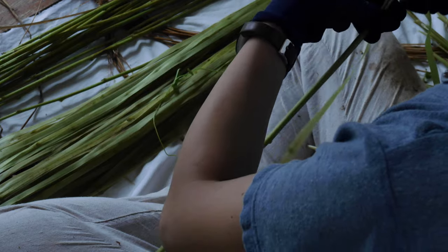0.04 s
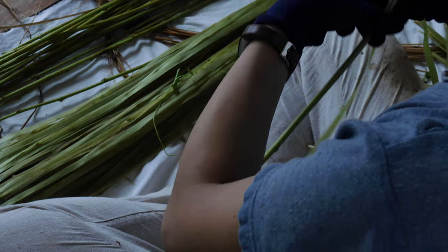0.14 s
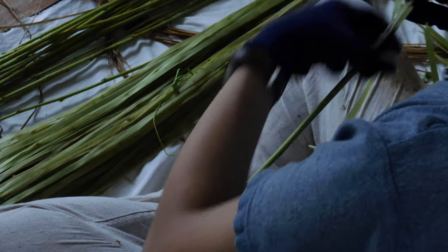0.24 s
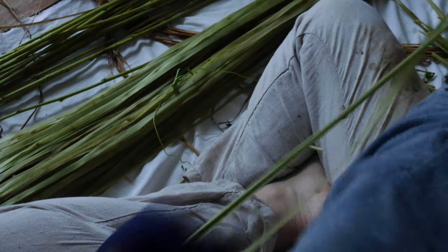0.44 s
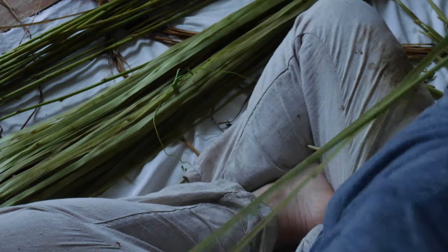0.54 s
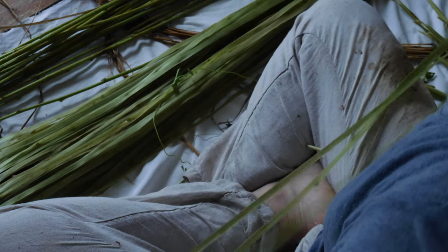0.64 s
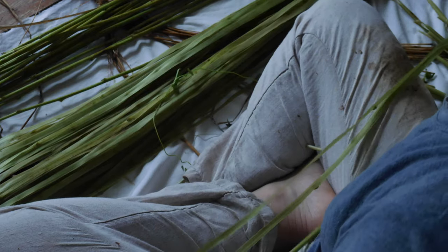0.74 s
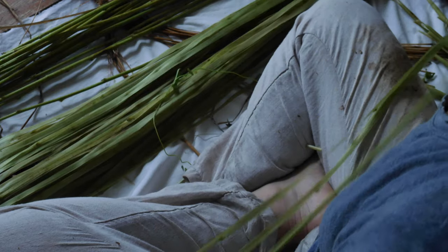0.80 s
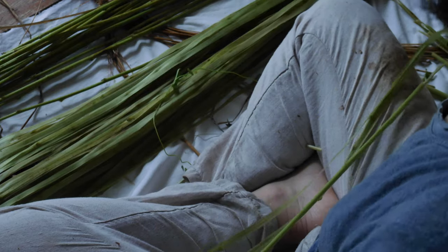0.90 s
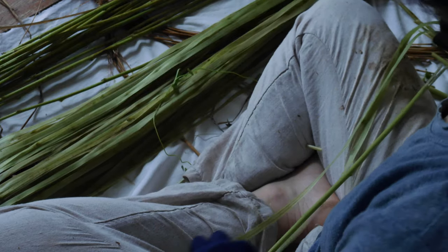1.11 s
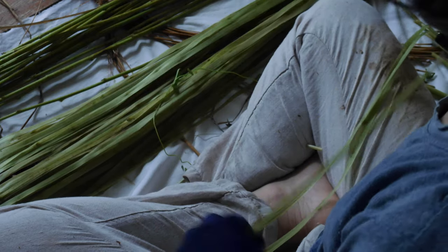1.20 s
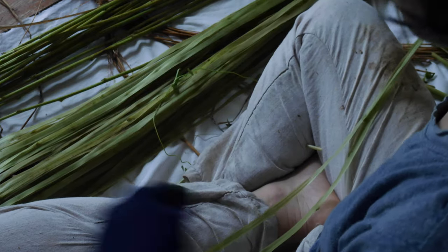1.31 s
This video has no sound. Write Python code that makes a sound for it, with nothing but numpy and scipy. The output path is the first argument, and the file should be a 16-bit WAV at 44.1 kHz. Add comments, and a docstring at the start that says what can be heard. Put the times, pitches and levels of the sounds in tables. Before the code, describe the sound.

A plant stem tears in one crackling pull, with dull knocks over faint outdoor hiss.

```python
"""Over a faint steady hiss, gloved hands knock and crack a green plant stem.
A strip of fibre is then ripped off in one long pull: thousands of tiny fibres snap,
its edge sizzles, and the taut strip rings higher as it speeds up. Halfway it catches once,
then tears on while a sleeve rubs. Last, a loose leaf brushes past.
Nearby surfaces answer each sound briefly."""
import sys
import numpy as np
from scipy import signal
from scipy.fft import rfft, irfft, next_fast_len
from scipy.io import wavfile

SR = 44100
rng = np.random.default_rng(int(sys.argv[2]) if len(sys.argv) > 2 else 0)


def dump(signal):
    """Clip the signal to [-1, 1] and save it as 16-bit WAV at the path in sys.argv[1]."""
    limited = np.clip(np.atleast_2d(signal).T, -1, 1)
    pcm = np.round(limited * 32767).astype(np.int16)
    wavfile.write(sys.argv[1], SR, pcm)


N = 59535
T = np.arange(N) / SR


def amp(db):
    """Amplitude ratio of a level in decibels."""
    return 10 ** (np.asarray(db) / 20)


def unit(x):
    """Normalisation to an rms of 1."""
    return x / np.sqrt(np.mean(x ** 2) + 1e-20)


def read(points, hz):
    """Interpolation of a table on a logarithmic frequency axis."""
    f, value = np.transpose(points)
    return np.interp(np.log(hz + 1), np.log(f + 1), value)


def level(times, db):
    """Amplitude envelope along a level curve, silent outside it."""
    return amp(np.interp(T, times, db)) * (T > times[0]) * (T < times[-1])


def strokes(rows, attack_s):
    """Damped transients: summed envelopes of linear rise and exponential decay."""
    return sum(amp(db) * np.clip((T - s) / attack_s, 0, 1) * np.exp(-np.maximum(T - s, 0) / decay)
               for s, db, decay in rows)


def colour(x, points):
    """Minimum-phase filtering: the Hilbert transform derives a causal phase from the log gain."""
    size = 2 * next_fast_len(N)
    log_gain = np.log(amp(read(points, abs(np.fft.fftfreq(size, 1 / SR)))))
    response = np.exp(np.conj(signal.hilbert(log_gain)))[:size // 2 + 1]
    return irfft(rfft(x, size) * response, size)[..., :N]


def resonate(x, hz, width_hz):
    """Resonance by heterodyning: shift the pitch hz to zero, low-pass with two poles, shift back."""
    carrier = np.exp(2j * np.pi * np.cumsum(hz * np.ones(N)) / SR)
    r = np.exp(-np.pi * width_hz / SR)
    return (carrier * signal.lfilter([(1 - r) ** 2], [1, -2 * r, r * r], x / carrier + 1e-18)).real


def wander(hz):
    """Random fluctuation: noise low-passed at hz."""
    rolloff = 1 + (np.fft.rfftfreq(N, 1 / SR) / hz) ** 4
    return unit(irfft(rfft(rng.standard_normal(N)) / rolloff, N))


def clicks(per_s, spread_db):
    """Shot noise: independent impulses of uneven size and random sign."""
    size = amp(spread_db * np.minimum(rng.exponential(1, N), 4))
    return unit(size * rng.choice([-1, 1], N) * (rng.random(N) < per_s / SR))


def place(x, left_db):
    """Localisation by a level difference between the channels."""
    return x * amp([[left_db / 2], [-left_db / 2]])


def hiss():
    """Partly coherent outdoor noise: low correlation makes the bass wide, high the treble narrow."""
    # background spectrum (frequency [Hz], level [dB])
    spectrum = [(25, -12), (65, -10.5), (110, -2.5), (160, -3), (205, 1), (255, -3), (330, -0.5), (500, -3),
                (900, -5.5), (1700, -9), (2150, -7), (2550, -13), (3800, -14.5), (4270, -8), (4800, -20),
                (6000, -17.5), (6950, -13.5), (7700, -18.5), (8900, -18), (10500, -28.5), (15000, -36)]
    # likeness of left and right (frequency [Hz], correlation [1])
    likeness = [(50, -0.22), (400, -0.37), (1200, -0.2), (2400, 0.14), (4400, 0.67), (8000, 0.84),
                (15000, .35)]
    common, independent = rfft(rng.standard_normal((2, N)))
    rho = np.clip(read(likeness, np.fft.rfftfreq(N, 1 / SR)), -1, 1)
    pair = irfft(np.array([common, rho * common + np.sqrt(1 - rho ** 2) * independent]), N)
    return amp(-52.5 + 0.45 * wander(hz=15)) * unit(colour(pair, spectrum))


def reverberation(x):
    """A diffuse field decays exponentially, differently in each channel, and is strongest in the bass."""
    # time to fall by 60 dB (frequency [Hz], time [s])
    decay_times = [(200, .5), (800, 0.87), (2000, 0), (6000, 0.23), (14000, 0.06)]
    # strength of the diffuse echo (frequency [Hz], gain [dB])
    echo_gain = [(100, 1), (400, -5), (800, -6), (1400, -9.5), (2400, -7.5), (4000, -8), (9000, -9),
                 (12000, -7)]
    hz, t, noise = signal.stft(rng.standard_normal((2, SR // 2)), SR, nperseg=256)
    t60 = read(decay_times, hz)[:, None]
    tail = signal.istft(noise * amp(-60 * t / t60) / np.sqrt(t60), SR, nperseg=256)[1]
    tail *= np.clip(np.arange(tail.shape[1]) / SR / 0.0034, 0, 1) ** 2  # builds up in 3.4 ms
    tail /= np.linalg.norm(tail, axis=1, keepdims=True)
    return colour(signal.fftconvolve(x.mean(0)[None], tail, axes=1)[:, :N], echo_gain)


def reflections(x):
    """Comb filtering: delayed copies off the nearest surfaces interfere with the direct sound."""
    # echoes from legs and ground (delay [s], gain [dB], left minus right [dB])
    echoes = [(.0012, -31, 1), (.0035, -22.5, -6), (.0058, -18.5, 2), (.0081, -20, -6)]
    return sum(amp(db) * place(np.interp(T - delay, T, x.mean(0), left=0), left_db)
               for delay, db, left_db in echoes)


def sleeve():
    """Friction noise: the sleeve rubs as the arm draws back."""
    # rubbing envelope (time [s], level [dB])
    rub = [(.52, -62), (.56, -54), (.60, -51.5), (.725, -52.5), (.76, -64)]
    # cloth spectrum (frequency [Hz], level [dB])
    spectrum = [(40, -31), (110, -18.5), (190, -13.5), (275, 0), (380, -7), (650, -2.5), (1200, -14),
                (5000, -36)]
    return unit(colour(clicks(per_s=1500, spread_db=2.5), spectrum)) * level(*np.transpose(rub))


def leaf():
    """Sliding contact: a loose leaf brushes past in one short rustle."""
    # contact (time [s], level [dB], decay [s])
    brush = [(1.137, -49, 0.019)]
    # rustle spectrum (frequency [Hz], level [dB])
    spectrum = [(300, -24), (1500, -8), (2300, 1), (3000, -1), (3700, 1), (4700, -14), (7000, -16),
                (12000, -30)]
    return unit(colour(clicks(per_s=5000, spread_db=1.0), spectrum)) * strokes(brush, attack_s=.007)


def knocks():
    """Soft impact: each knock of glove on stem gives a dull thud and a damped resonance."""
    # impacts (time [s], level [dB], decay [s], pitch [Hz])
    impacts = [(.009, -47, 0.024, 425), (0.035, -43, 0.022, 421), (0.054, -48.5, 0.015, 446),
               (.183, -54.5, .03, 400), (.333, -45, 0.025, 517), (.474, -40.5, 0.019, 1026),
               (0.482, -45, 0.022, 418), (0.572, -43.5, .025, 447), (.648, -47.5, 0.012, 560),
               (.719, -51, 0.011, 600)]
    # thud spectrum (frequency [Hz], level [dB])
    spectrum = [(40, -25), (110, -8.5), (260, -3.5), (480, 4), (720, -4.5), (1050, 0.5), (1400, -8.5),
                (1900, -4.5), (2600, -14.5), (4000, -19), (12000, -45)]
    thud = amp(-3) * unit(colour(clicks(per_s=4000, spread_db=1.5), spectrum))
    out = np.zeros(N)
    for s, db, decay, hz in impacts:
        body = unit(resonate(clicks(per_s=2500, spread_db=1.5), hz, width_hz=104))
        out += (thud + body) * strokes([(s, db, decay)], attack_s=0.0032)
    return out


def cracks():
    """Brittle fracture: the stem gives dry cracks as the grip shifts."""
    # fractures (time [s], level [dB], decay [s])
    fractures = [(.0503, -35.5, 0.0057), (.058, -45.5, 0.0091), (.073, -51, .011)]
    # crack spectrum (frequency [Hz], level [dB])
    spectrum = [(200, -28), (1200, -20), (1850, -1), (2400, -6.5), (3400, -2), (4300, 0.5), (5200, -8),
                (7200, -6), (9500, -11), (11000, -22), (15000, -36)]
    crackle = unit(colour(clicks(per_s=9000, spread_db=1.0), spectrum))
    return crackle * strokes(fractures, attack_s=0.0011)


def snaps():
    """Sudden release of tension: each thick fibre lets go in a short ringing burst."""
    # breaks (time [s], duration [s], level [dB], pitch [Hz], resonance width [Hz])
    breaks = [(0.294, .035, -36, 6500, 3400), (0.3467, 0.0021, -21, 9970, 3600),
              (0.417, 0.0061, -34, 8970, 600), (.564, 0.0062, -39.5, 9800, 4000),
              (0.5713, 0.00127, -30, 2120, 3020), (0.6513, 0.0022, -26.5, 6670, 2200),
              (0.649, 0.0017, -31, 10200, 3600)]
    out = np.zeros(N)
    for s, duration, db, hz, width in breaks:
        excitation = rng.choice([-1, 1], N) * (T > s) * (T < s + duration)
        burst = resonate(resonate(excitation, hz, width), hz, width)
        out += amp(db) * unit(burst) * np.sqrt(duration * SR / N)  # energy grows with duration
    return out


def edge_sizzle(jerks):
    """High-frequency shot noise: dense tiny breaks make the edge of the strip sizzle."""
    # sizzle envelope (time [s], level [dB])
    envelope = [(.202, -74.5), (0.215, -60), (0.22, -45), (.25, -42.5), (.275, -43.5), (.335, -35),
                (.352, -31), (.375, -37.5), (.41, -32.5), (.46, -35.5), (.495, -38), (.513, -45.5),
                (.565, -41), (.59, -49), (.715, -56), (.75, -74)]
    # sizzle spectrum (frequency [Hz], level [dB])
    spectrum = [(2000, -35), (6000, -3), (8000, -13), (8900, 2), (9800, -.5), (10700, -4), (11700, -4),
                (13000, -15), (15000, -37)]
    breaks = clicks(per_s=14000, spread_db=2.1) * jerks
    return unit(colour(breaks, spectrum)) * level(*np.transpose(envelope))


def strip_ring(jerks, width_hz=2050):
    """Forced resonance: breaking fibres pluck the taut strip, which rings higher as it speeds up."""
    # gliding ring (time [s], pitch [Hz], level [dB])
    glide = [(.21, 2070, -61), (0.246, 2050, -43), (.305, 2350, -32), (.33, 2360, -33), (.358, 3650, -37),
             (.45, 3470, -37), (.495, 3360, -50.5), (0.525, 1970, -51), (.541, 1850, -32),
             (0.557, 1820, -32.5), (.585, 2200, -40), (.62, 2750, -40.5), (.665, 2600, -41.5),
             (.72, 2100, -42), (.732, 2370, -47), (.80, 2520, -66)]
    # the stem's radiation, weak below its bending modes (frequency [Hz], gain [dB])
    radiation = [(500, -15.5), (1200, -6.5), (1550, 0.5), (3800, 0), (9000, -7)]
    times, hz, db = np.transpose(glide)
    pitch = np.interp(T, times, hz)
    plucks = clicks(per_s=5000, spread_db=1.1) * jerks
    ring = resonate(resonate(plucks, pitch, width_hz), pitch, width_hz)
    return unit(colour(ring, radiation)) * level(times, db)


def tear(jerks):
    """Acoustic emission: thousands of fibre breaks merge into a broadband tearing noise."""
    # envelope of the pull (time [s], level [dB])
    pull = [(.212, -70), (.223, -58), (.265, -44), (.303, -38), (.335, -33.5), (.36, -32), (.44, -39),
            (.472, -42), (0.488, -34.5), (0.512, -41), (.55, -34.5), (.571, -33.5), (.59, -38), (.655, -36),
            (0.721, -41), (.731, -45.5), (.765, -55), (.82, -69)]
    # tearing spectrum (frequency [Hz], level [dB])
    spectrum = [(60, -25.5), (200, -13.5), (450, -9.5), (780, -6.5), (1100, -1), (1380, -1.5), (1650, 2),
                (2050, 2.5), (2450, -1.5), (3100, 2.5), (4100, 0.5), (4750, -1.5), (5600, -1), (7200, -1),
                (7900, -10), (8600, -5.5), (11200, -10.5), (13000, -23), (15500, -39)]
    breaks = clicks(per_s=11000, spread_db=2.7) * jerks
    return unit(colour(breaks, spectrum)) * level(*np.transpose(pull))


def rip():
    """Common amplitude modulation: fibres part in jerky clumps that drive tear, ring and sizzle alike."""
    jerks = unit(amp(1.4 * wander(hz=300)))
    return (place(tear(jerks), left_db=1.0)
            + place(strip_ring(jerks), left_db=0.3)
            + place(edge_sizzle(jerks), left_db=-1.5))


def scene():
    """Superposition of the direct sound, its echoes and the background."""
    direct = rip() + snaps() + place(knocks() + cracks() + leaf() + sleeve(), left_db=1.2)
    return direct + reflections(direct) + reverberation(direct) + place(hiss(), left_db=-.6)


def record(dry):
    """Mid-side stereo: the microphone pair widens the bass, and a low-pass limits the band."""
    # boost of the side signal (frequency [Hz], gain [dB])
    side_gain = [(60, 1.5), (200, 5), (500, 4.5), (1200, 2), (3000, 0.5), (12000, 2)]
    mid = dry.mean(0)
    side = colour((dry[0] - dry[1]) / 2, side_gain)
    lowpass = signal.firwin(511, cutoff=15400, window=("kaiser", 9), fs=SR)
    return signal.oaconvolve(np.array([mid + side, mid - side]), lowpass[None], "same")


dry = scene()
out = record(dry)
dump(out)
```